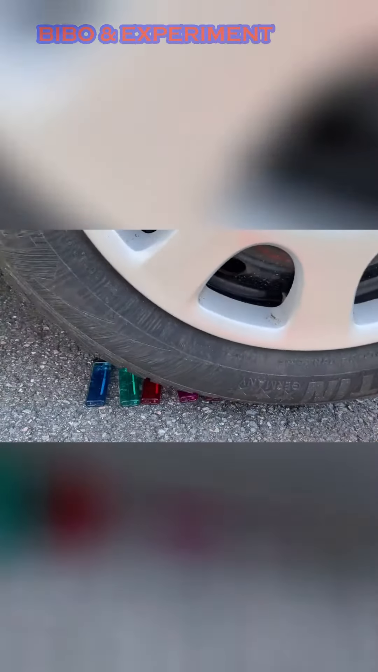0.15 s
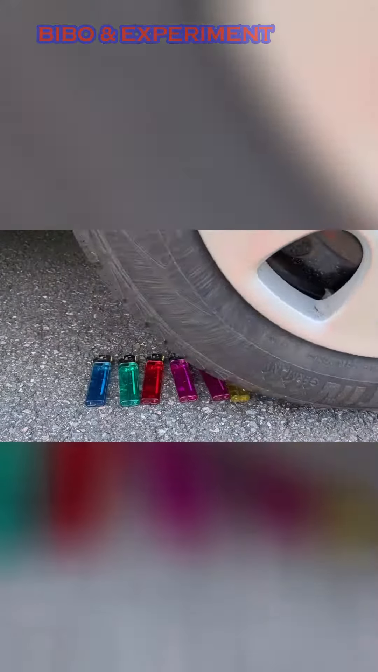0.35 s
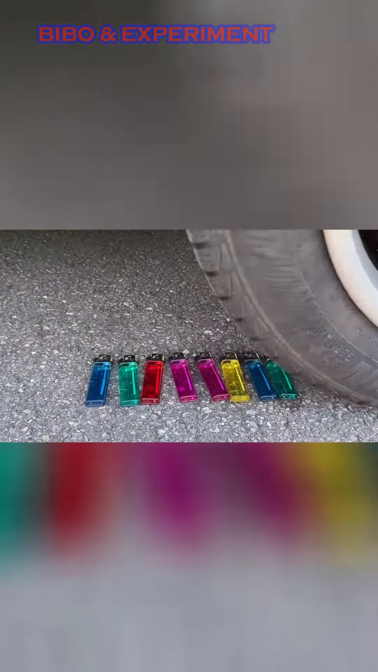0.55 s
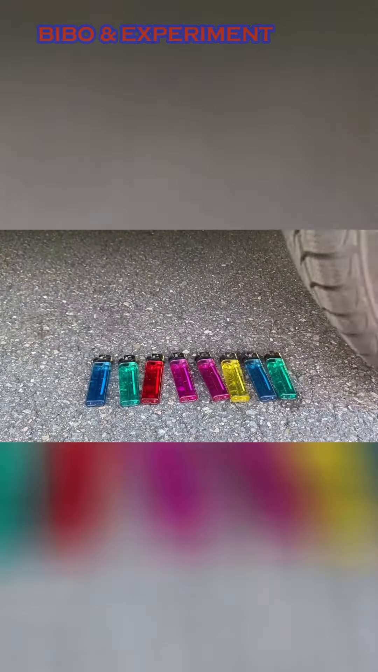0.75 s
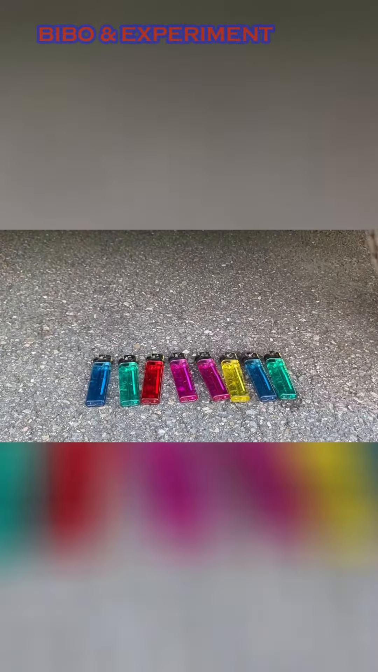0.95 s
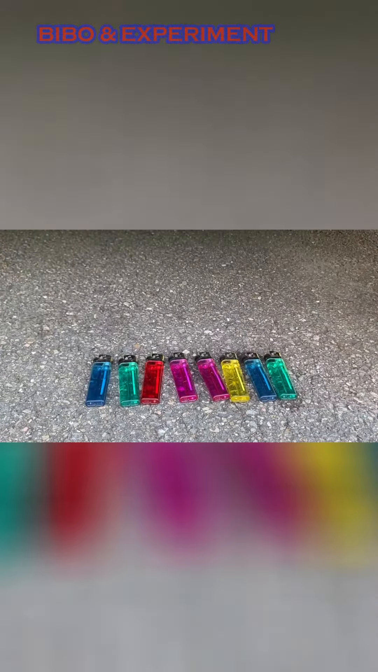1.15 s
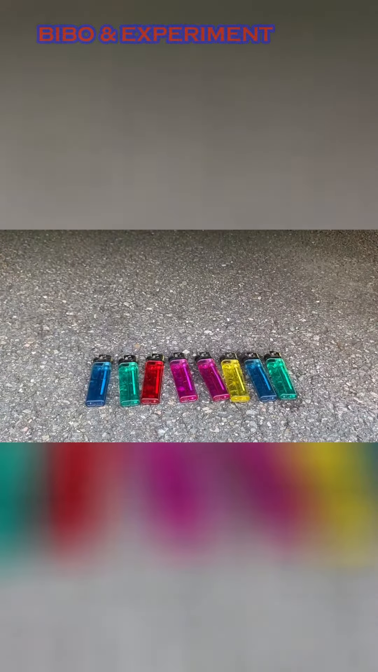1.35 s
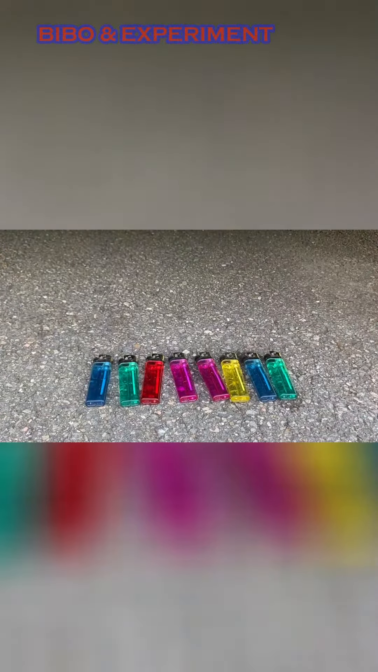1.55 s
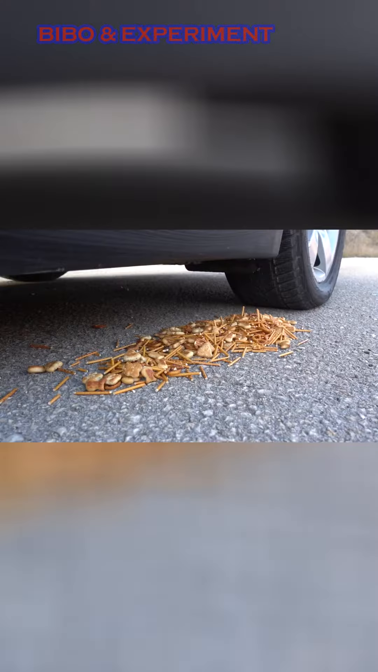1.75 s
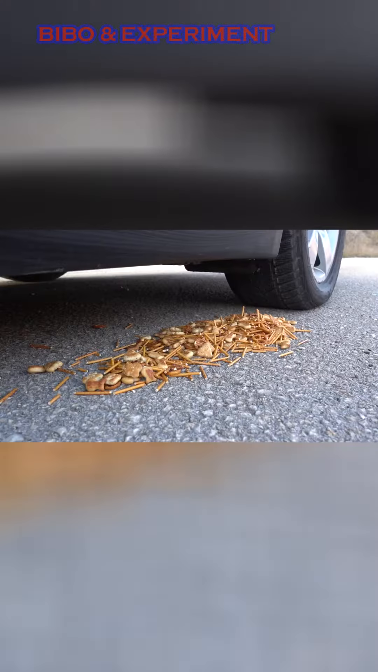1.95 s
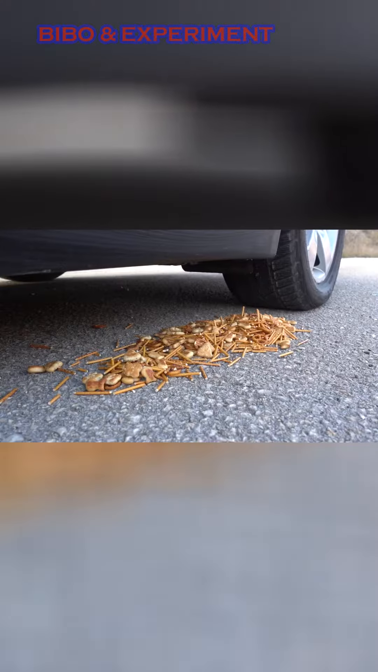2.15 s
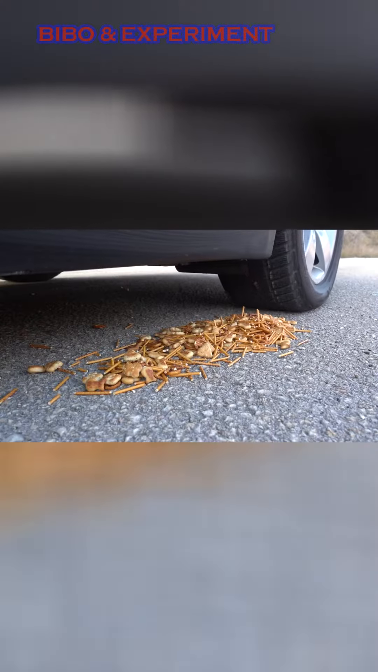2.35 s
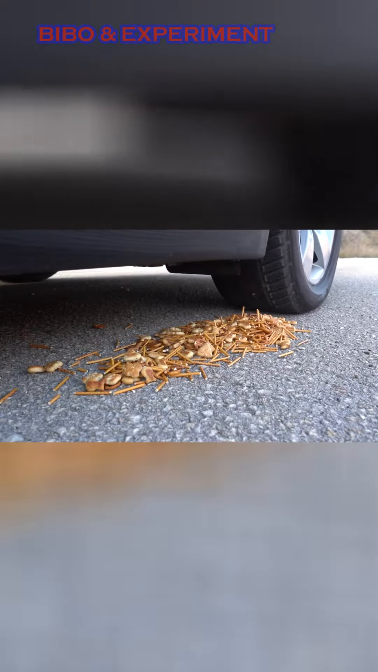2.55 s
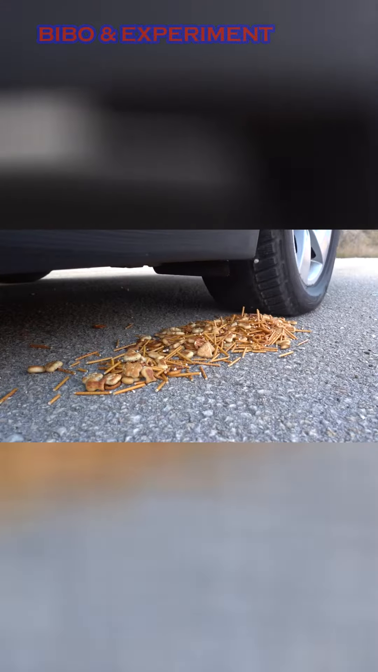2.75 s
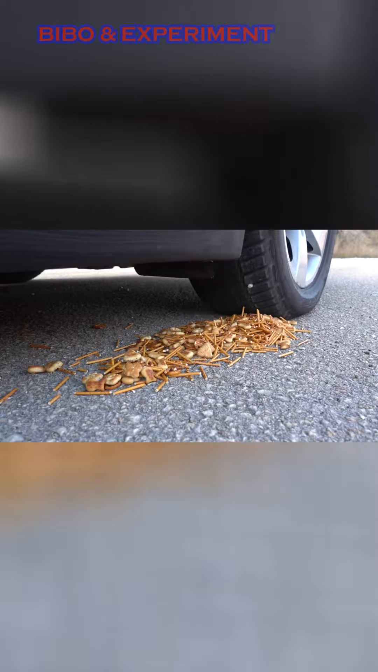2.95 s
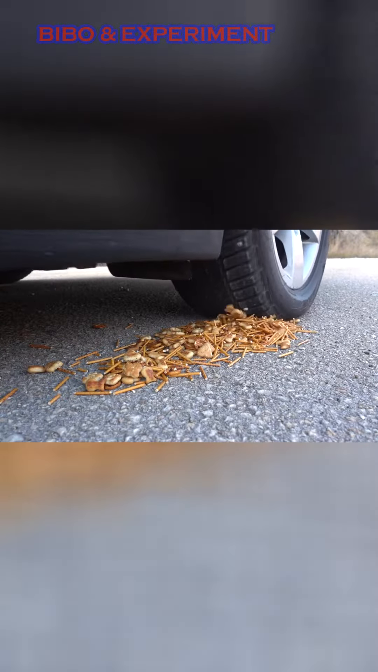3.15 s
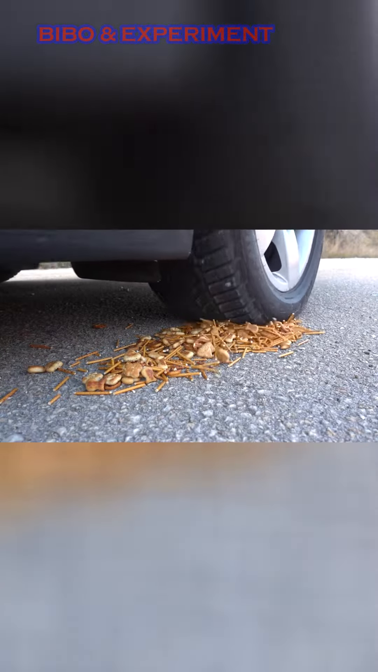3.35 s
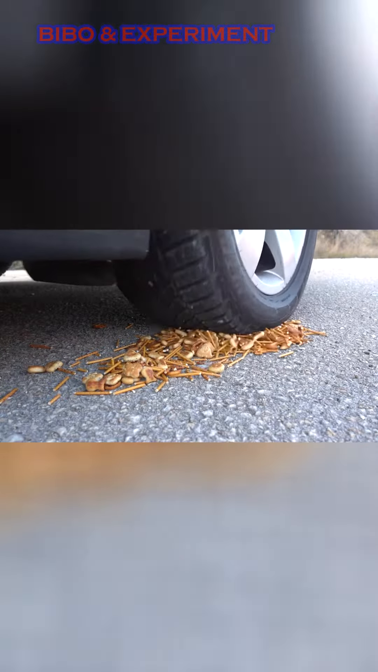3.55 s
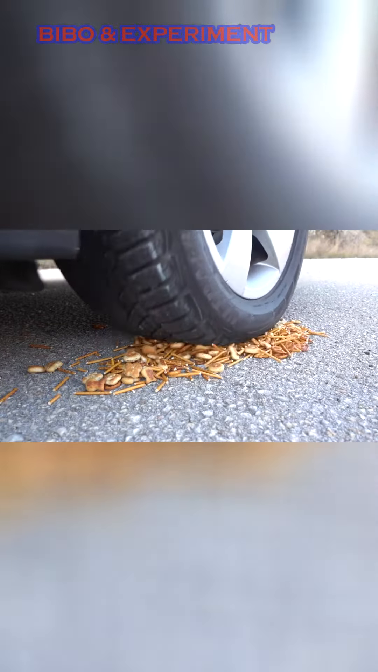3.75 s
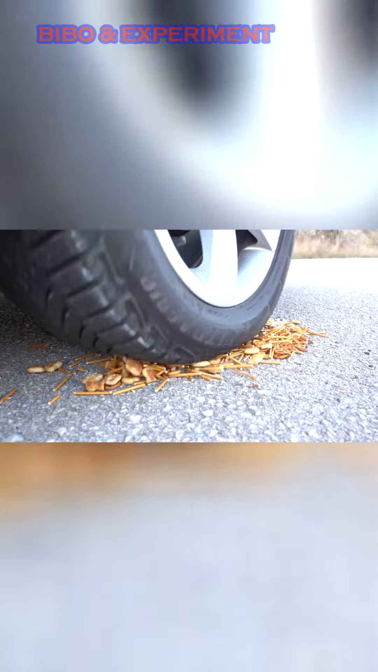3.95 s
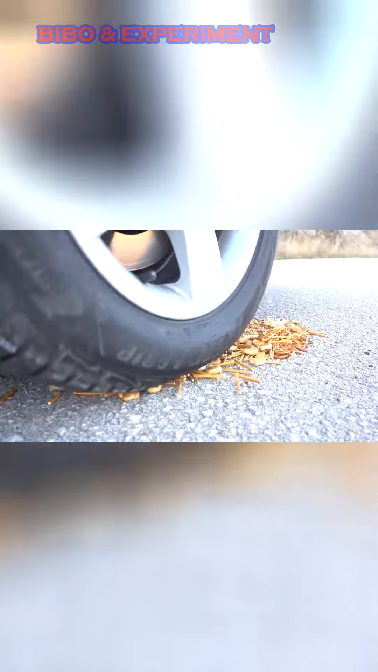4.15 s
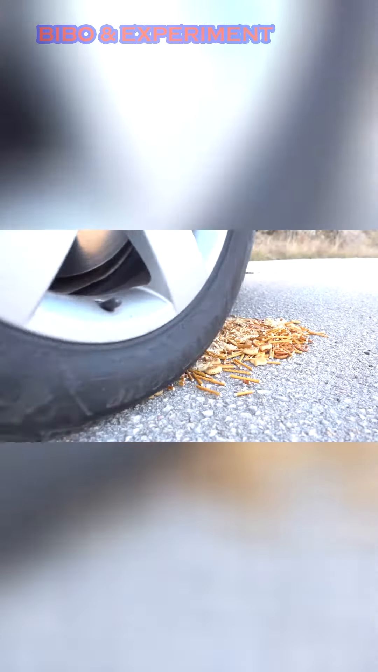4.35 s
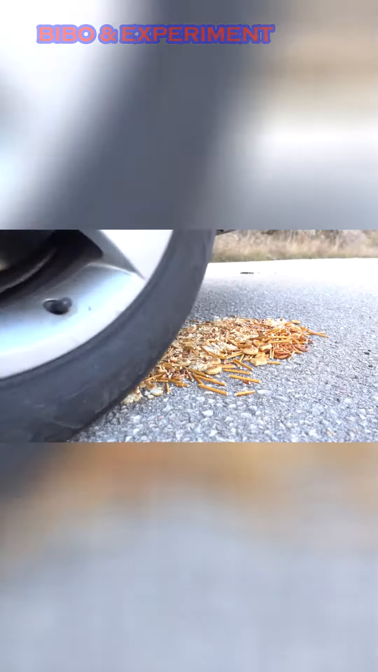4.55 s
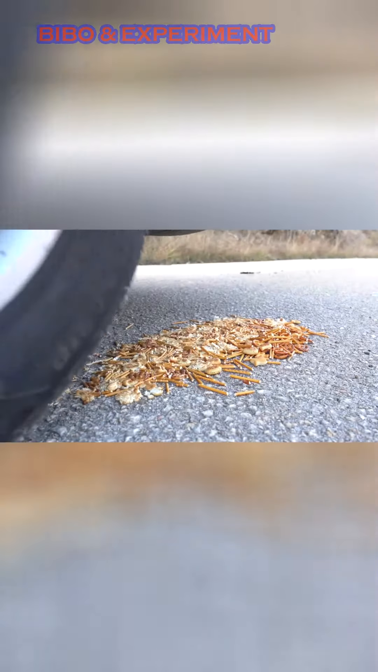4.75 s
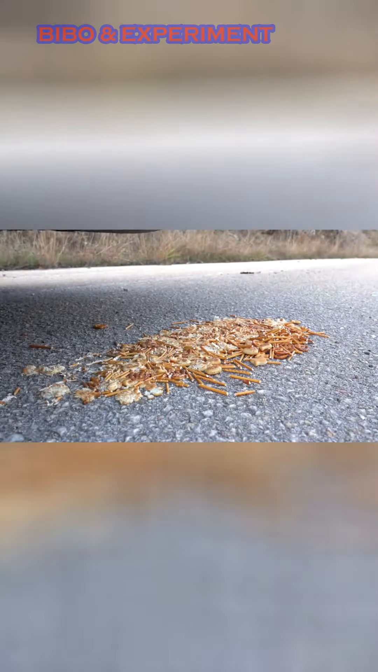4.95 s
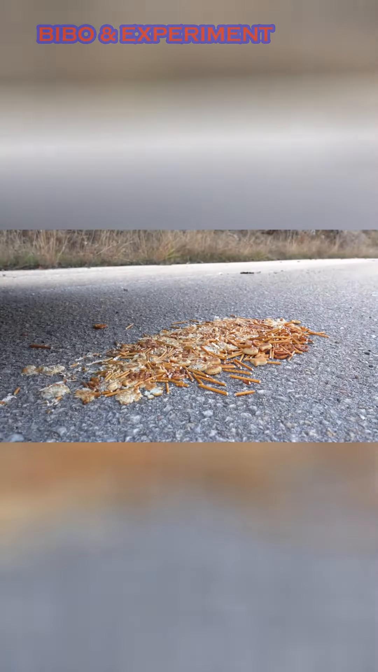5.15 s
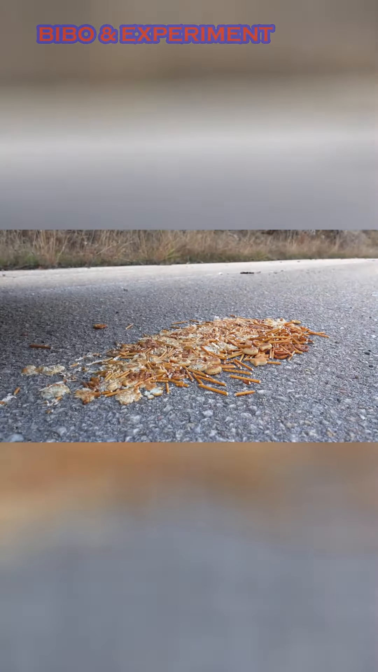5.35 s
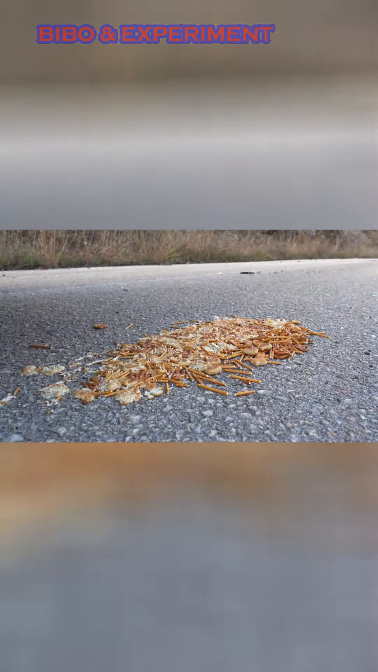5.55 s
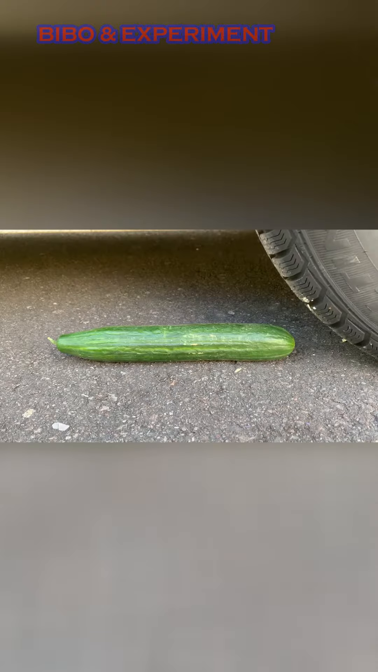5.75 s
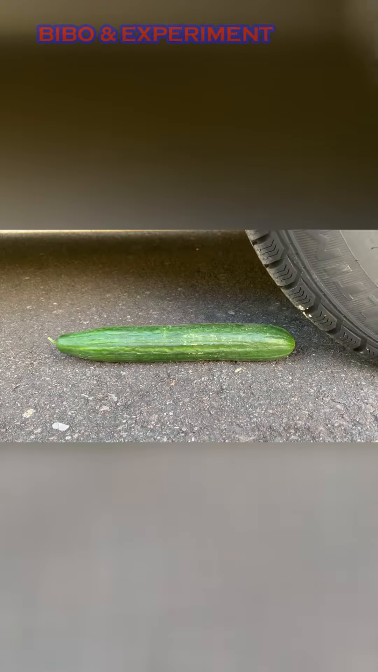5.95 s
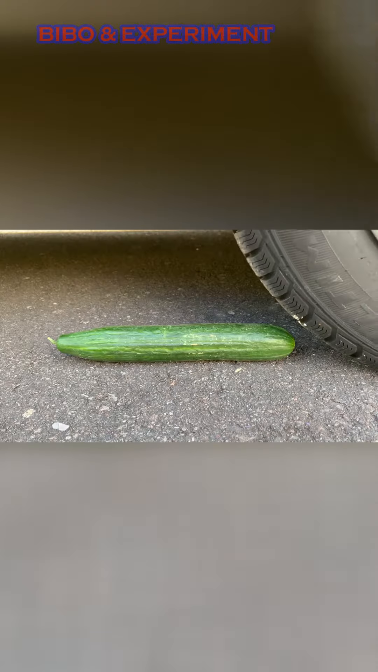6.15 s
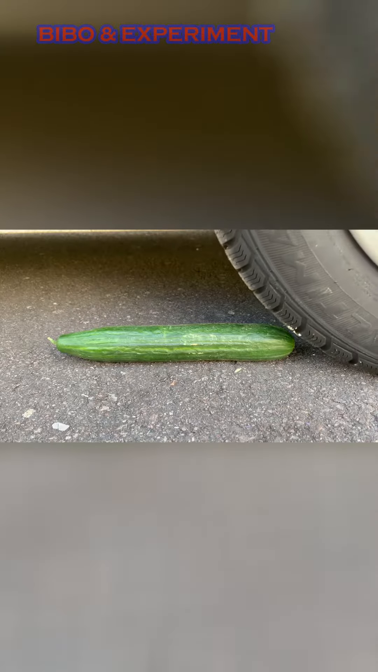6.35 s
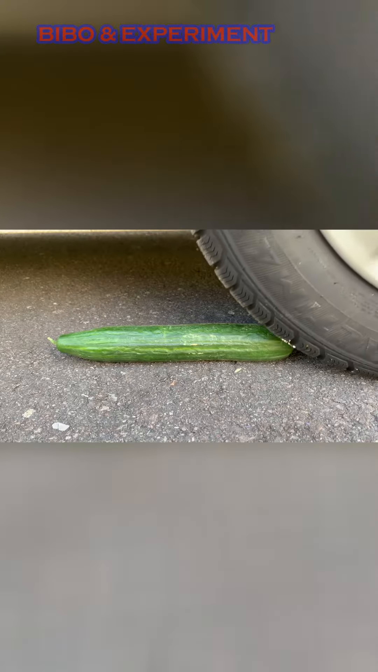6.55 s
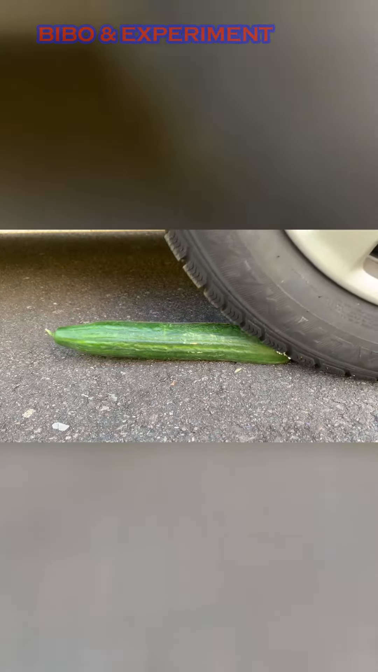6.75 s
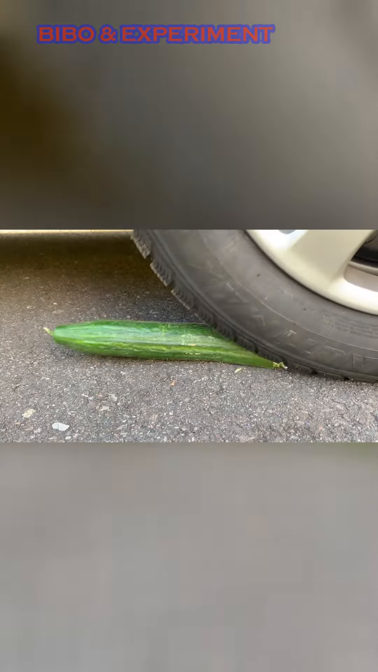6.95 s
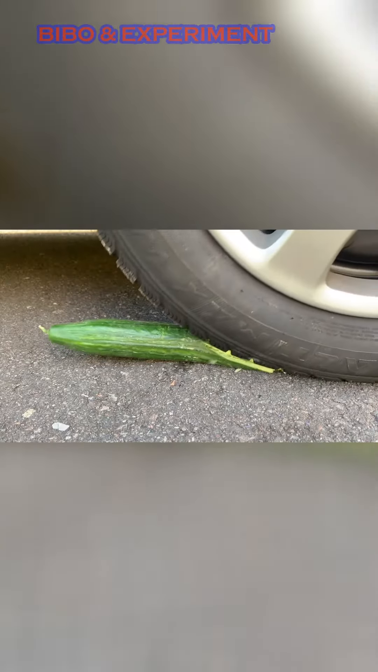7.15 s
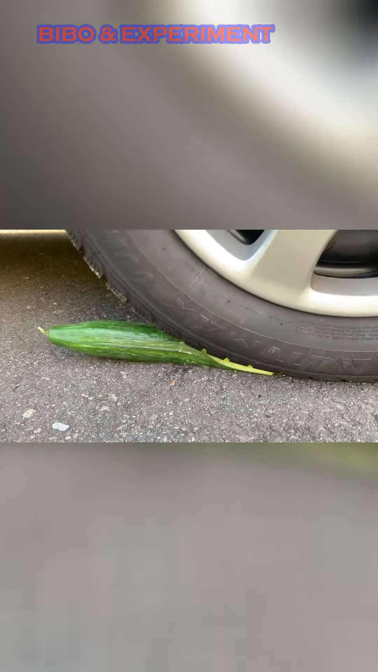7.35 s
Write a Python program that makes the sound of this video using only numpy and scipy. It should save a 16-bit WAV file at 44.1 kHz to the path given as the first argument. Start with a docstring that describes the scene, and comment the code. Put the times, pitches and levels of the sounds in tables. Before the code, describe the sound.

A car idles as its tyre rolls off plastic lighters with two clicks, the second a hollow pop. After a hard cut, a quiet car coasts closer on asphalt, grit popping, and crushes crackers and pretzel sticks in a loud, dense, dry crunch, followed by scattered pops. Another cut brings a labouring idle and a cucumber splitting in quick wet snaps. The microphone is close, outdoors.

```python
"""Tyre crushing things on asphalt

Three close scenes joined by hard cuts. An idling car rolls off plastic lighters with two clicks.
A quiet car coasts through a heap of crackers and pretzel sticks, thousands of brittle fractures,
and carries crumbs away in its tread. An idling car splits a cucumber in a run of wet snaps.
The engines hum at their crank orders and clatter with each firing; cracks echo under the car."""
import sys
import numpy as np
from scipy import signal
from scipy.fft import rfft, irfft
from scipy.io import wavfile

SR = 44100
rng = np.random.default_rng(int(sys.argv[2]) if len(sys.argv) > 2 else 0)


def master_out(mix):
    """Clip the mix to full scale and print it as 16-bit PCM to the path in sys.argv[1]."""
    frames = np.transpose(np.atleast_2d(mix))
    ceiling = np.clip(frames, -1, 1)
    pcm = np.round(ceiling * 32767).astype(np.int16)
    wavfile.write(sys.argv[1], SR, pcm)


N = 325899
TIME = np.arange(N) / SR
LIGHTERS_SPAN_S, SNACKS_SPAN_S, CUCUMBER_SPAN_S = (0, 1.624), (1.656, 5.739), (5.772, 7.4)
# tread touches the heap, climbs it, bears on it, drops off
CONTACT_S, CLIMB_S, BEAR_S, LEAVE_T60_S = 2.9026, 0.19, 1.2765, 0.17

# Table levels are relative.
# crank speed: t/s, speed/(turns/s)
FIRST_SPEED = [(0, 12.28)]
SECOND_SPEED = [(5.77, 12.1), (6.5, 12.2), (6.75, 12.5), (6.95, 12.3), (7.15, 12.2), (7.39, 12.8)]
# engine hum: crank order, level/dB
FIRST_ORDERS = [(2, -17), (4, -17.5), (6, 3), (8, -15.5), (9, -11.5), (12, -21.5), (15, -12), (16, -24.5),
                (20, -16.5), (24, -24), (30, -23.5)]
SECOND_ORDERS = [(2, -7), (4, -15), (5, -8), (6, 2), (7, -23), (8, -9), (10, 2.5), (12, 4), (13, -10.5),
                 (14, -13), (18, -4), (20, -11.5), (26, -18), (61, -14.5)]
# exhaust and panel modes: f/Hz, width/Hz, level/dB
FIRST_MODES = [(753, 120, -8), (1123, 86, -6.5), (1750, 63, -19), (2330, 130, -20), (2896, 37, -20),
               (5200, 78, -26)]
SECOND_MODES = [(567.7, 27, -5), (763, 32, -18), (1038, 46, -18)]
# hum of the labouring engine: t/s, level/dB
SECOND_EFFORT = [(5.78, -38), (6.2, -30.5), (6.45, -36), (6.72, -37.5), (6.95, -29), (7.15, -34),
                 (7.39, -29.5)]
# stereo width: f/Hz, side/dB
CLATTER_WIDTH = [(60, -2), (250, -7.5), (1300, -4), (3000, -1.5), (10000, 0)]
ROAR_WIDTH = [(60, -85), (240, -23.5), (950, -6.5), (3770, 2.5), (15000, 0.5)]
CRUNCH_WIDTH = [(60, -22), (240, -19), (950, -17), (3770, -11), (15000, -0.5)]
# tone colour as heard: f/Hz, level/dB
FIRST_CLATTER_COLOUR = [(50, -26), (120, -2), (190, 0.5), (310, -5.5), (430, -1.5), (590, -7), (800, -7),
                        (1500, -13.5), (2500, -16.5), (5300, -23.5), (8000, -31), (11000, -29.5),
                        (15000, -48)]
ROAR_COLOUR = [(18, -58), (30, -1.5), (157, -0.5), (233, 0.5), (412, -4.5), (709, -0.5), (1640, -30),
               (1810, -12.5), (2900, -21), (4870, -24), (11000, -28.5), (14300, -86), (22000, -120)]
GRIT_COLOUR = [(300, -2.5), (800, 2), (1400, 5.5), (1900, -6), (2600, -2.5), (4000, -8.5), (5700, -24),
               (7200, -23), (11000, -15)]
THUMP_COLOUR = [(40, -15), (90, 0), (135, 5.5), (185, -6), (270, -4), (450, -8.5), (750, -16), (1200, -32),
                (3000, -60)]
CRUNCH_COLOUR = [(50, -11.5), (110, 0), (140, -6), (175, -9.5), (260, -3.5), (360, -10), (470, 1.5),
                 (760, 0.5), (1100, -2), (1700, -8.5), (3300, -12), (5000, -17.5), (8000, -16),
                 (11000, -18.5)]
# tone colour of clatter, wet crackle and snaps as heard, notched near 5 and 7.4 kHz: f/Hz, level/dB
SECOND_CLATTER_COLOUR = [(40, -2), (90, 6.5), (235, 1), (330, -12.5), (470, 2.5), (610, -4), (690, -12),
                         (790, -14.5), (1250, -14), (1500, -24.5), (3600, -31.5), (5000, -47),
                         (7400, -48.5), (8500, -27.5), (12000, -57)]
WET_CRACKLE_COLOUR = [(400, 3), (900, 0), (1700, 7), (2800, -2.5), (3600, -4), (5000, -12), (6000, -10),
                      (7300, -20), (8500, -8), (11000, -23), (15000, -26)]
SPLIT_SNAP_COLOUR = [(300, -8), (1000, 13), (2600, -1.5), (3500, 7), (4900, -15), (5900, 1), (7300, -16),
                     (8400, 6.5), (10000, -15), (15000, -24)]
# lighters let go by the tyre: t/s, ring/dB, f/Hz, ring/cycles, snap/dB, drop/dB
LIGHTER_CLICKS = [(.2491, -31, 1900, 0.63, -29.5, -50), (.4719, -22.5, 1770, 1.1, -26, -30)]
# nearness of the coasting wheel: t/s, level/dB
WHEEL_NEARNESS = [(1.66, -14.5), (2.3, -12.5), (2.68, -8.5), (2.86, -8.5), (4.45, 2.5), (4.8, -0.36),
                  (5.72, 1)]
# wheel position: t/s, left minus right/dB
WHEEL_PAN = [(2, 5.5), (2.6, -0.5), (3.2, -1.5), (3.8, 0), (4.3, 2.5), (4.8, 1.5), (5.3, 3), (5.7, 2.5)]
# wheel resonances: f/Hz, level/dB
WHEEL_RESONANCES = [(722, -70.5), (1852, -58), (2110, -60.5), (2900, -64)]
# low thumps: t/s, level/dB, hold/s
LOW_THUMPS = [(1.817, -45.5, 0.099), (1.94, -33, 0.013)]
# gritty scuffs: t/s, level/dB, length/s, low/Hz, high/Hz
GRIT_SCUFFS = [(1.894, -48, .02, 130, 1140), (1.944, -58, 0.025, 2280, 3420), (2.097, -44, 0.11, 200, 1010),
               (2.255, -43.5, 0.07, 196, 1030)]
# stones and crumbs popping out: t/s, ring/dB, f/Hz, ring/cycles, drop/dB
STONE_POPS = [(2.3312, -45, 1980, 0.91, -75), (2.5105, -36, 2190, 0.84, -70),
              (2.617, -27.5, 1900, 0.53, -58), (2.647, -35.5, 1890, 0.67, -68),
              (2.678, -34, 2000, 1.1, -67), (2.694, -33, 2160, 1.2, -52), (2.757, -33, 1900, 0.68, -69),
              (4.498, -24, 1400, 0.88, -49), (4.525, -24, 1700, 0.57, -45), (4.5725, -16, 1830, 0.79, -41),
              (4.655, -28, 1480, 0.93, -44), (4.892, -27.5, 1440, 1.9, -25.5),
              (4.902, -24, 1720, 0.62, -43), (5.151, -24, 1410, 0.45, -36), (5.403, -27, 2440, 0.5, -53),
              (5.454, -25, 1800, 0.5, -46), (5.566, -45, 1500, .8, -27), (5.5937, -13.5, 1860, 2, -27.5),
              (5.5974, -17.5, 1950, 1.2, -40), (5.6867, -30, 1990, 1.3, -55),
              (5.7226, -31, 1610, 0.75, -45)]
# splinter sprays as layers collapse: t/s, level/dB
SPLINTER_SPRAYS = [(3.105, -27.5), (3.168, -30), (3.28, -27), (3.52, -25.5), (3.778, -28.5)]
# pretzel sticks at the heap's edges: t/s, ring/dB, f/Hz, snap/dB
STICK_SNAPS = [(2.952, -20, 1000, -32), (2.99, -16, 1500, -19.5), (3.0136, -12, 1120, -24),
               (4.4749, -13.5, 1730, -9.5)]
# whole crackers breaking, thin ones higher: t/s, level/dB, f/Hz
CRACKER_BREAKS = [(3.0314, -2.5, 1060), (3.079, -7, 656), (3.098, -7, 780), (3.124, -4, 740),
                  (3.138, -6.5, 860), (3.159, -3, 745), (3.176, -7.5, 690), (3.2249, -5.5, 826),
                  (3.3311, -6.5, 595), (3.405, -5, 565), (3.4638, -6, 820), (3.517, -4, 780),
                  (3.5703, -4.5, 1750), (3.6241, -2.5, 1040), (3.6604, -15.5, 1500), (3.7046, -12, 2760),
                  (3.7746, -22.5, 1990), (3.8304, -7.5, 1550), (3.868, -3.5, 2590), (3.9205, -7, 860),
                  (3.9398, -11.5, 613), (3.975, -8.5, 2070), (4.0585, -3.5, 3530), (4.1218, -5, 920),
                  (4.1682, -4.5, 1210), (4.2406, -12, 560), (4.272, -7, 1360), (4.3074, -4.5, 1330),
                  (4.3309, -11, 1520), (4.3502, -10.5, 1750), (4.378, -10, 1090), (4.3945, -11, 1380)]
# cucumber splitting: t/s, force/dB, ring/dB, f/Hz, skin snap/dB
CUCUMBER_SPLITS = [(6.673, -24.5, -60, 1210, -46), (6.7766, -15, -19, 1780, -24),
                   (6.8423, -17, -28, 1280, -18.5), (6.882, -10.5, -8.5, 1640, -16.5),
                   (6.9075, -25, -27, 1790, -24.5), (6.9357, -10.5, -15, 1820, -19.5),
                   (6.9426, -26, -19, 1600, -20), (6.9632, -30, -35, 3000, -26.5),
                   (6.9818, -21.5, -12, 1960, -27), (6.9844, -35, -17, 1990, -30),
                   (7.002, -27, -23, 1800, -29), (7.171, -40, -28.5, 1690, -37),
                   (7.3309, -27.5, -28, 1450, -33)]


def amp(db):
    """Decibels to gain."""
    return 10 ** (np.asarray(db) / 20)


def unit(x):
    """Scale to rms 1; stereo by its mid."""
    return x / np.sqrt(np.mean(np.atleast_2d(x).mean(0) ** 2) + 1e-20)


def curve(rows):
    """(t/s, value) rows interpolated per sample."""
    return np.interp(TIME, *np.transpose(rows))


def envelope(start_s, attack_s, hold_s, t60_s):
    """Linear rise, hold, exponential decay."""
    age_s = TIME - start_s
    return np.clip(age_s / attack_s, 0, 1) * amp(-60 * np.maximum(age_s - attack_s - hold_s, 0) / t60_s)


def gate(start_s, end_s):
    """Open over a span, with 3 ms ramps."""
    return np.clip(np.minimum(TIME - start_s, end_s - TIME) / .003, 0, 1)


def add(mix, at_s, sound):
    """Mix a sound in place."""
    part = mix[max(round(at_s * SR), 0):][:len(sound)]
    part += sound[:len(part)]


def band(x, hz, kind, order=2):
    """Butterworth low-pass or high-pass."""
    return signal.sosfilt(signal.butter(order, min(hz, SR / 2 - 100), kind, fs=SR, output="sos"), x)


def band_limit(x, hz):
    """Steep stereo low-pass."""
    return signal.oaconvolve(x, signal.firwin(511, hz, window=("kaiser", 9), fs=SR)[None], "same")


def soft_clip(x, ceiling=.8):
    """Round off the highest peaks."""
    return x / (1 + (x / ceiling) ** 4) ** .25


def colour(x, tone, size=4096):
    """Minimum-phase filter from (f/Hz, level/dB) rows."""
    hz, db = np.transpose(tone)
    bin_hz = abs(np.fft.fftfreq(size, 1 / SR))
    log_gain = np.log(amp(np.interp(np.log(bin_hz + 1), np.log(hz + 1), np.maximum(db, -100))))
    taps = np.fft.ifft(np.exp(np.conj(signal.hilbert(log_gain)))).real[:size // 2]
    return np.apply_along_axis(lambda v: signal.oaconvolve(v, taps)[:N], -1, x)


def stereo(mid_side, width):
    """Mid and side to left and right; width filters the side."""
    side = colour(mid_side[1], width)
    return np.array([mid_side[0] + side, mid_side[0] - side])


def drift(hz):
    """Random wander below hz, rms 1."""
    rolloff = 1 + (np.fft.rfftfreq(N, 1 / SR) / hz) ** 4
    return unit(irfft(rfft(rng.standard_normal(N)) / rolloff, N))


def resonate(x, hz, width_hz, passes=2):
    """Drive one resonance; output rms 1."""
    for _ in range(passes):
        x = signal.lfilter(*signal.iirpeak(hz, hz / width_hz, fs=SR), x)
    return unit(x)


def noise(tone, width):
    """Coloured stereo noise, rms 1."""
    return unit(colour(stereo(rng.standard_normal((2, N)), width), tone))


def ring(hz, cycles, size=2048):
    """A swing that builds and dies away, peak 1."""
    turns = np.arange(size) * hz / SR
    swing = np.sin(2 * np.pi * turns) * turns * np.exp(-2 * turns / cycles)
    return swing / abs(swing).max()


def plop(open_hz, slack_hz, sag_s, fade_s, size=2048):
    """A hollow swing, falling in pitch as it dies."""
    t = np.arange(size) / SR
    hz = slack_hz + (open_hz - slack_hz) * np.exp(-t / sag_s)
    return np.sin(2 * np.pi * np.cumsum(hz) / SR) * np.exp(-t / fade_s)


def snap(decay_s, size=2048):
    """A decaying noise burst."""
    return rng.standard_normal(size) * np.exp(-np.arange(size) / SR / decay_s)


def grains(per_s, spread_db, lo_hz, hi_hz, cycles, clump_db, pitches=20):
    """Tiny clumped fractures of varied pitch, size and place, as mid and side."""
    out = np.zeros((2, N))
    clumps = amp(clump_db * np.clip(drift(37), -2, 2))
    for hz in np.geomspace(lo_hz, hi_hz, pitches):
        when, rarity, place = rng.random((int(per_s * N / SR / pitches), 3)).T
        at = (when * N).astype(int)
        strength = amp(spread_db * np.minimum(-np.log(rarity), 4)) * clumps[at] * (-1) ** at
        train = np.zeros((2, N))
        train[:, at] = strength, strength * np.sqrt(3) * (2 * place - 1)
        out += signal.oaconvolve(train, hz / hi_hz * ring(hz, cycles, size=512)[None], axes=1)[:, :N]
    return out


def underbody(x, t60_s, wet_db, top_hz, size=6000):
    """Quick echoes between road, tyre and floor pan: dull, wider in the treble."""
    t = np.arange(size) / SR
    taps = rng.standard_normal((2, size)) * (rng.random((2, size)) < .1)
    taps *= amp(-60 * t / t60_s) * (t > .002)
    taps = band(taps / np.linalg.norm(taps[0]), top_hz, "low", order=1)
    echoes = signal.oaconvolve(x[None], taps, axes=1)[:, :N]
    return amp(wet_db) * stereo(echoes, [(200, -26), (1500, -2), (5000, 5)])


def engine(speed, orders, tone, modes, hum_db, clatter_db,
           firing_s, wobble, flutter, scatter_turns, left_db, right_lag_s, throb=0.19):
    """Crank orders hum; two firings a turn shake out clatter and ring the exhaust and panels."""
    turns = np.cumsum(curve(speed) * (1 + wobble * drift(5.2))) / SR
    turns -= np.interp(firing_s, TIME, turns)
    hum = unit(sum(amp(db) * np.cos(2 * np.pi * (order * turns + scatter_turns * rng.random()))
                   for order, db in orders))
    firing = 1 + throb * np.cos(2 * np.pi * 2 * turns)
    knocks = rng.standard_normal(N) * np.exp(-(2 * turns % 1) / 0.4)
    rings = sum(amp(db) * resonate(knocks, hz, width_hz) for hz, width_hz, db in modes)
    clatter = amp(clatter_db) * (firing * noise(tone, CLATTER_WIDTH) + rings)
    pan = amp([[left_db / 2], [-left_db / 2]])
    left, right = amp(hum_db) * hum * (1 + flutter * drift(22)) + pan * clatter
    return np.array([left, np.interp(TIME - right_lag_s, TIME, right)])


def first_idle(swell_period_s=0.446, crest_s=0.046, shade_db=-2, wheel_past_s=0.96):
    """The hum swells and sinks evenly; the clatter is shaded until the wheel has passed."""
    swell_db = np.cos(2 * np.pi * (TIME - crest_s) / swell_period_s)
    clatter_db = -39 + shade_db * np.maximum(1 - TIME / wheel_past_s, 0) + 0.1 * swell_db
    return engine(FIRST_SPEED, FIRST_ORDERS, FIRST_CLATTER_COLOUR, FIRST_MODES,
                  hum_db=-31.5 + swell_db, clatter_db=clatter_db, firing_s=.895, wobble=0.003,
                  flutter=0.095, scatter_turns=0.59, left_db=3, right_lag_s=0.00037)


def cracks(rows, snap_s, knock_hz, thud_hz, thud_db):
    """A sharp snap, a short ring of the piece, then knock and thud as the tyre drops onto it."""
    body, snaps = np.zeros(N), np.zeros((2, N))
    for at_s, ring_db, hz, cycles, snap_db, drop_db in rows:
        knock = ring(knock_hz * rng.uniform(0.42, 1), 0.84)
        drop = knock + amp(thud_db) * ring(thud_hz * rng.uniform(0.68, 2), 1)
        add(body, at_s, amp(ring_db) * ring(hz, cycles))
        add(body, at_s + 0.00055, amp(drop_db) * drop / abs(drop).max())
        for channel in snaps:
            add(channel, at_s, amp(snap_db) * snap(snap_s))
    tone = [(300, -6), (1500, 4.5), (3500, 5.5), (5200, 9), (8700, -1), (11000, 2), (15000, -23)]
    direct = body + stereo(colour(snaps, tone), [(2000, -15), (8000, 0)])
    return direct + underbody(direct.mean(0), t60_s=0.029, wet_db=-6, top_hz=1570)


def lighters(pop_s=.4727, pop_db=-15):
    """Two plastic clicks; the second lighter springs free with a hollow, echoing pop."""
    pop = np.zeros(N)
    add(pop, pop_s, amp(pop_db) * plop(open_hz=1240, slack_hz=220, sag_s=0.0023, fade_s=0.0066))
    echoes = underbody(pop, t60_s=0.093, wet_db=-2.5, top_hz=1500)
    return pop + echoes + cracks(LIGHTER_CLICKS, snap_s=0.0012, knock_hz=745, thud_hz=328, thud_db=11)


def rolling(roar_db=-45, grit_db=-48.5, grit_growth=1.48):
    """Tyre roar; wheel resonances and grit under the tread gain faster than it as the wheel nears."""
    near_db = curve(WHEEL_NEARNESS)
    roar = amp(roar_db + near_db + drift(16)) * noise(ROAR_COLOUR, ROAR_WIDTH)
    rub = rng.standard_normal(N)
    wheel = sum(amp(db) * resonate(rub, hz, width_hz=70) for hz, db in WHEEL_RESONANCES)
    grit = grains(per_s=1800, spread_db=3.4, lo_hz=900, hi_hz=9000, cycles=1, clump_db=1.8)
    grit = unit(colour(stereo(grit, [(500, -20), (1500, -1), (4000, 3)]), GRIT_COLOUR))
    return roar + amp(2 * near_db) * wheel + amp(grit_db + grit_growth * near_db) * grit


def bumps(roughness_db=2.5):
    """Soft low thumps and abrupt gritty scuffs as the car nears."""
    level = sum(amp(db) * envelope(at_s, 0.025, hold_s, t60_s=0.36) for at_s, db, hold_s in LOW_THUMPS)
    out = level * unit(colour(rng.standard_normal(N), THUMP_COLOUR))
    grit = rng.standard_normal(N) * amp(roughness_db * np.clip(drift(300), -2, 2))
    for at_s, db, length_s, lo_hz, hi_hz in GRIT_SCUFFS:
        progress = np.linspace(0, 1, int(length_s * SR))
        rub = grit[int(at_s * SR):][:len(progress)]
        rub = unit(band(band(rub, hi_hz, "low", order=4), lo_hz, "high", order=4))
        add(out, at_s, amp(db) * rub * np.interp(progress, [0, .03, .6, 1], [0, 1, .8, 0]))
    return out


def stones(snap_db=-22):
    """Stones and crumbs pop from under the tread: mostly ring, little snap."""
    rows = [(at_s, db, hz, cycles, db + snap_db, drop_db) for at_s, db, hz, cycles, drop_db in STONE_POPS]
    return cracks(rows, snap_s=0.00046, knock_hz=673, thud_hz=264, thud_db=-2.5)


def crunch(touch_db=-13.5, edge_db=-5.5, deepest_s=4.01, lull_s=4.308, crossover_hz=520):
    """Brittle fractures in the heap: thuds, coarse crunch, sharp snaps, sprays of splinters."""
    climb = np.clip((TIME - CONTACT_S) / CLIMB_S, 0, 1)
    contact = envelope(CONTACT_S, 0.0065, CLIMB_S + BEAR_S, LEAVE_T60_S)
    lull_db = -6 * np.exp(-((TIME - lull_s) / 0.017) ** 2)
    load = contact * amp(touch_db * (1 - climb ** 1.35) + lull_db)
    depth_db = np.interp(TIME, [CONTACT_S, deepest_s, CONTACT_S + CLIMB_S + BEAR_S], [edge_db, 0, edge_db])
    fractures = (grains(per_s=4500, spread_db=3.2, lo_hz=200, hi_hz=3500, cycles=1.1, clump_db=.8),
                 grains(per_s=1500, spread_db=3.3, lo_hz=1700, hi_hz=5000, cycles=.9, clump_db=1),
                 grains(per_s=9000, spread_db=2.8, lo_hz=4500, hi_hz=12000, cycles=1.3, clump_db=.6))
    coarse, sharp, fine = (colour(stereo(x, CRUNCH_WIDTH), CRUNCH_COLOUR) for x in fractures)
    thuds = amp(-24) * unit(band(coarse, crossover_hz, "low", order=3))
    body = unit(band(band(coarse, crossover_hz, "high", order=3), 1500, "low"))
    body *= amp(-20 - 6 * (1 - climb))
    snaps = climb * amp(-25.5 + depth_db) * unit(band(sharp, 1200, "high"))
    sprays = sum(amp(db) * np.exp(-((TIME - at_s) / 0.0094) ** 2) for at_s, db in SPLINTER_SPRAYS)
    flurry = amp(-28 + depth_db + 1.7 * drift(37))
    splinters = np.hypot(flurry, sprays) * unit(band(fine, 2670, "high"))
    direct = load * (amp(0.29 * depth_db) * (thuds + body) + snaps + splinters)
    return direct + underbody(direct.mean(0), t60_s=0.088, wet_db=-12, top_hz=8150)


def tyre_air(lower_hz=227, upper_hz=245, level_db=-38):
    """Two wavering modes of the tyre's air ring; the upper lasts only while the heap shakes the tread."""
    lower = np.sin(2 * np.pi * np.cumsum(lower_hz + 2 * drift(10.5)) / SR) * (1 + 0.39 * drift(16))
    lower *= envelope(CONTACT_S, CLIMB_S, BEAR_S, t60_s=2.7)
    upper = resonate(rng.standard_normal(N), upper_hz, width_hz=24, passes=1)
    upper *= envelope(CONTACT_S, CLIMB_S, BEAR_S, LEAVE_T60_S)
    return amp(level_db) * (lower + upper)


def pretzel_sticks(drop_db=-31, cycles=0.56):
    """Dry sticks snap and leave a faint, thin ring; the tyre drops the same height on each."""
    after_ring = np.zeros(N)
    for at_s, _, _, snap_db in STICK_SNAPS:
        add(after_ring, at_s, amp(snap_db - 20) * ring(hz=2650, cycles=11))
    rows = [(at_s, db, hz, cycles, snap_db, drop_db) for at_s, db, hz, snap_db in STICK_SNAPS]
    return after_ring + cracks(rows, snap_s=0.00013, knock_hz=673, thud_hz=260, thud_db=-14)


def crackers(gain_db=-4.5, snap_s=0.00064, size=2048):
    """Whole crackers break in two steps a few milliseconds apart."""
    out = np.zeros(N)
    decay = np.exp(-np.arange(size) / SR / snap_s)
    for at_s, db, hz in CRACKER_BREAKS:
        for delay_s, share in ((.001, 1), (rng.uniform(0.00295, 0.007), .5)):
            fracture = band(amp(-1) * rng.uniform(-1.6, 1, size) * decay, 4 * hz, "low")
            piece = ring(hz * rng.uniform(0.9, 1.135), cycles=1.3)
            add(out, at_s + delay_s, share * amp(db + gain_db) * (piece + fracture))
    return out + underbody(out, t60_s=0.1, wet_db=-7.5, top_hz=4000)


def second_idle():
    """The engine labours, pushing the wheel onto the cucumber: hum surges, clatter stays level."""
    return engine(SECOND_SPEED, SECOND_ORDERS, SECOND_CLATTER_COLOUR, SECOND_MODES,
                  hum_db=curve(SECOND_EFFORT), clatter_db=-38.5, firing_s=6.068, wobble=0.0014,
                  flutter=0.036, scatter_turns=0.26, left_db=-0.5, right_lag_s=0.00028)


def whine(hz=5950, level_db=-71):
    """A thin, faint whine that fades as the wheel comes close."""
    fade = np.interp(TIME, [6.8, 6.95], [1, 0])
    return amp(level_db) * fade * np.sin(2 * np.pi * np.cumsum(hz + 6 * drift(30)) / SR)


def flesh_tearing(spray_hz=7000, spray_share=0.63):
    """Cucumber flesh crackles under the squeeze and at each split, then bursts and sprays juice."""
    squeeze = amp(-49) * envelope(start_s=6.505, attack_s=0.46, hold_s=0.26, t60_s=1)
    trails = sum(amp(force_db - 34) * envelope(at_s - .006, attack_s=0.0052, hold_s=0, t60_s=0.08)
                 for at_s, force_db, *_ in CUCUMBER_SPLITS)
    burst = amp(-31) * envelope(start_s=7.004, attack_s=0.012, hold_s=0, t60_s=0.16)
    cells = grains(per_s=4500, spread_db=3.5, lo_hz=800, hi_hz=12000, cycles=1.2, clump_db=2.2)[0]
    smeared = cells + underbody(cells, t60_s=0.0047, wet_db=-8, top_hz=9000)
    crackle = unit(colour(smeared, WET_CRACKLE_COLOUR))
    juice = unit(band(crackle, spray_hz, "high"))
    return (squeeze + trails + (1 - spray_share) * burst) * crackle + spray_share * burst * juice


def cucumber_splitting(right_db=3):
    """Skin snaps, flesh rings, and the opening crack plops over a low push of the tyre."""
    body, snaps = np.zeros(N), np.zeros((2, N))
    push = amp(-5.5) * ring(hz=235, cycles=1.44)
    for at_s, force_db, ring_db, hz, snap_db in CUCUMBER_SPLITS:
        hollow = plop(open_hz=780 * rng.uniform(0.8, 1.24), slack_hz=150, sag_s=0.00315, fade_s=0.0052)
        add(body, at_s + .0008, amp(force_db) * (hollow + push))
        add(body, at_s, amp(ring_db) * ring(hz, cycles=1.4))
        for channel in snaps:
            add(channel, at_s, amp(snap_db) * snap(decay_s=0.0015))
    direct = body + stereo(colour(snaps, SPLIT_SNAP_COLOUR), [(2000, -5), (8000, -1)])
    pan = amp([[-right_db / 2], [right_db / 2]])
    return pan * (direct + underbody(direct.mean(0), t60_s=0.075, wet_db=-3.5, top_hz=1299.4))


def scene():
    """Lighters, snacks, cucumber, gated in turn."""
    plastic = first_idle() + lighters()
    tread = rolling() + stones() + crunch() + pretzel_sticks() + crackers()
    pan = amp(np.outer([.5, -.5], curve(WHEEL_PAN)))
    snacks = band_limit(soft_clip(pan * tread + bumps() + tyre_air()), hz=11150)
    cucumber = second_idle() + whine() + flesh_tearing() + cucumber_splitting()
    return (gate(*LIGHTERS_SPAN_S) * plastic + gate(*SNACKS_SPAN_S) * snacks
            + gate(*CUCUMBER_SPAN_S) * cucumber)


def record(dry):
    """Overall treble limit."""
    return band_limit(dry, hz=15600)


dry = scene()
out = record(dry)
master_out(out)
```